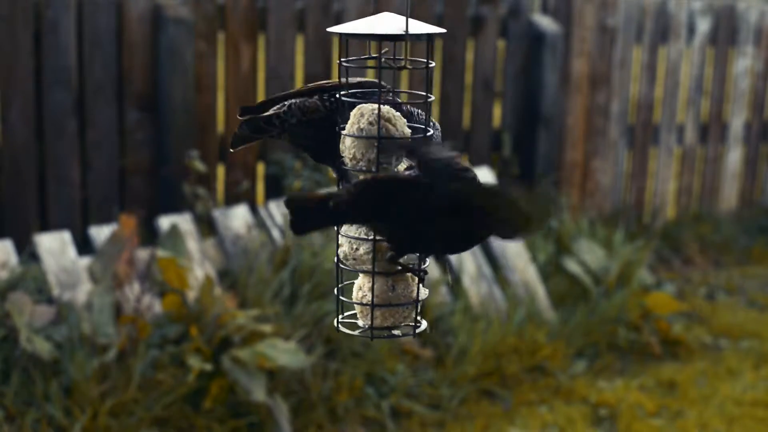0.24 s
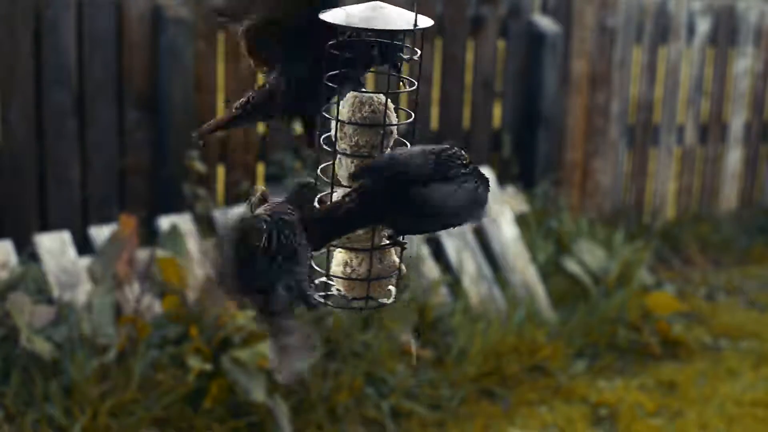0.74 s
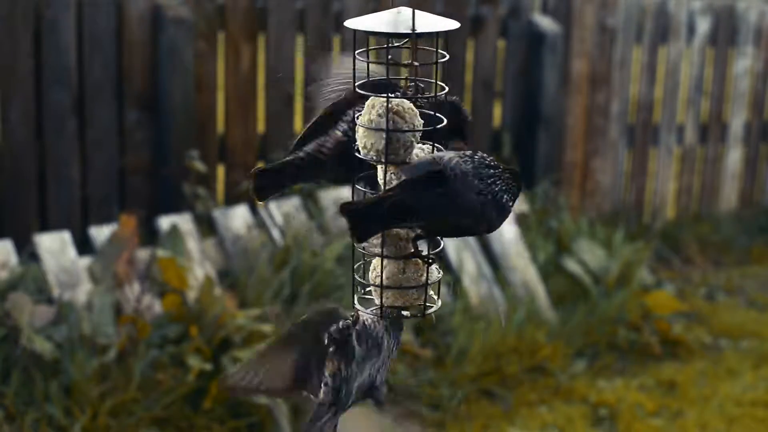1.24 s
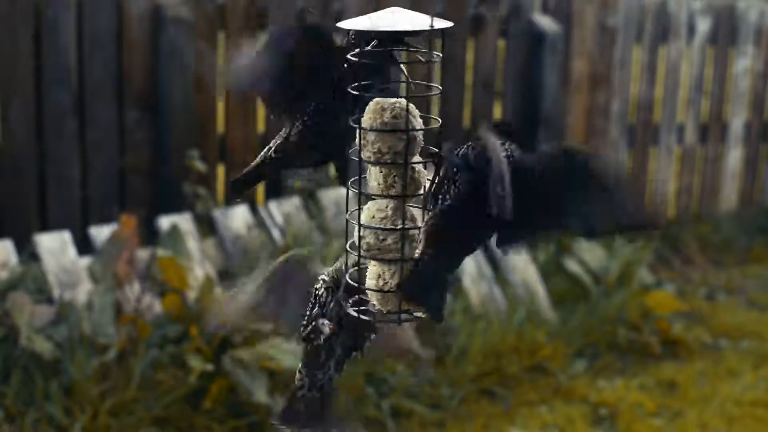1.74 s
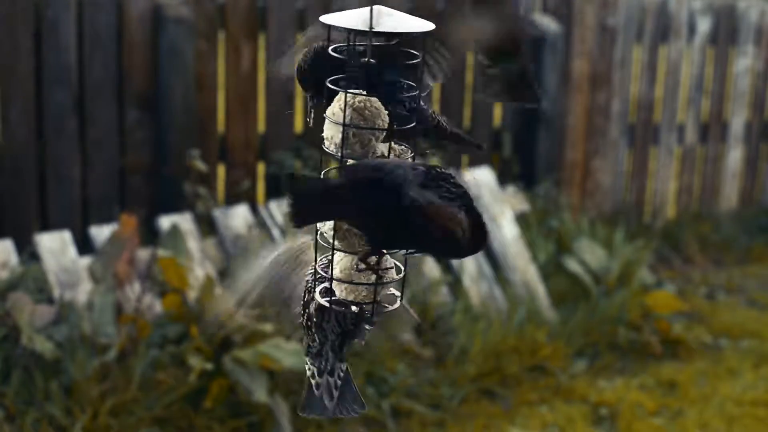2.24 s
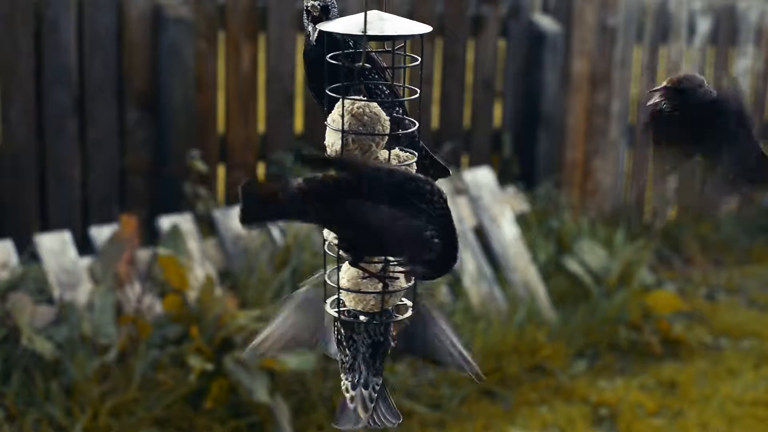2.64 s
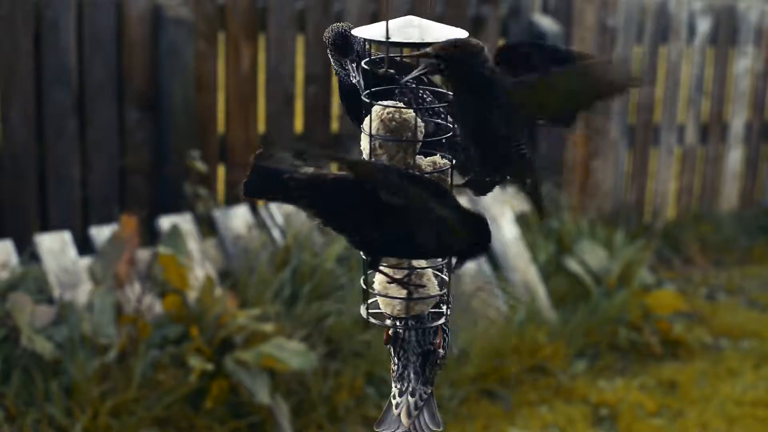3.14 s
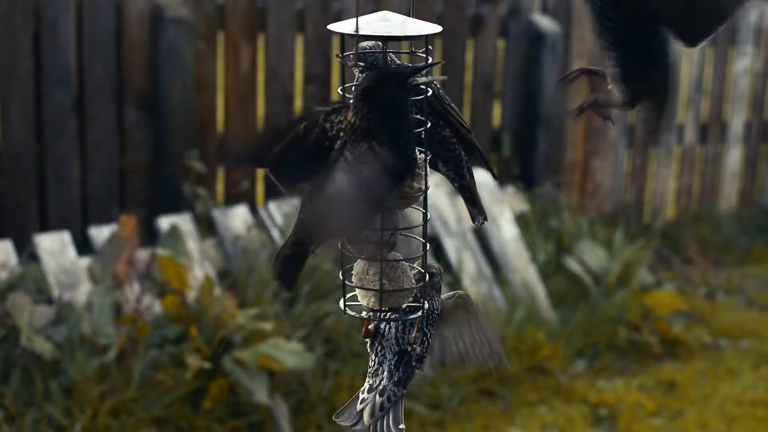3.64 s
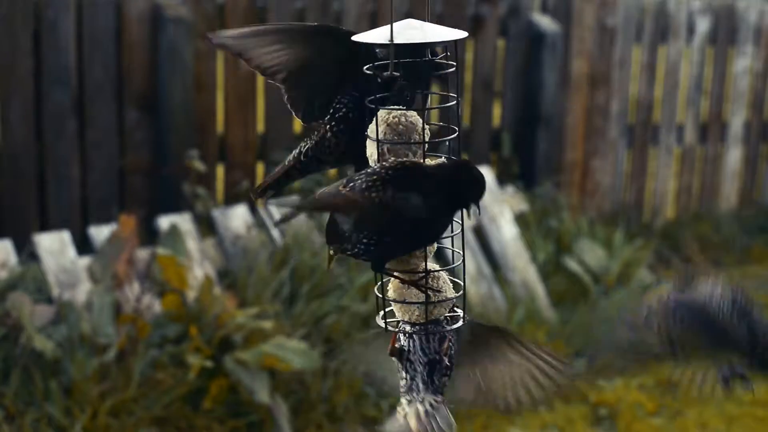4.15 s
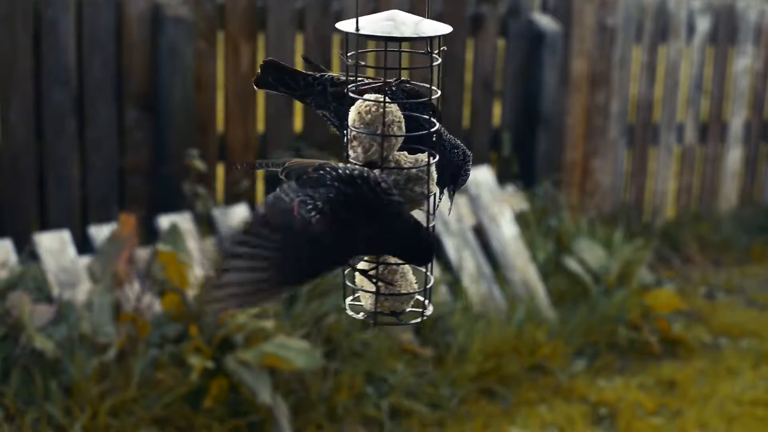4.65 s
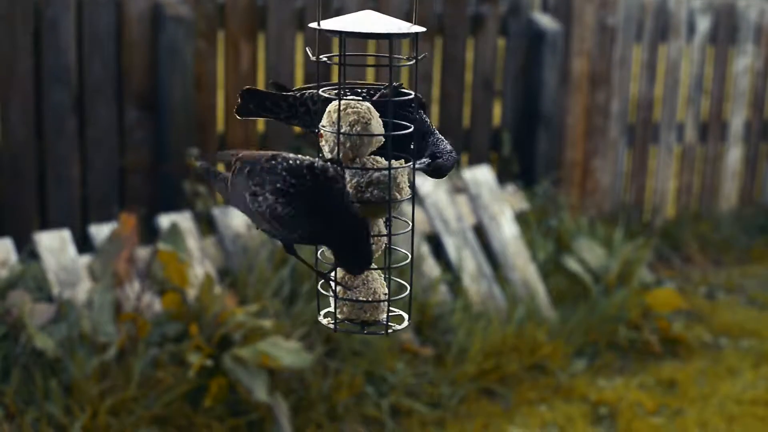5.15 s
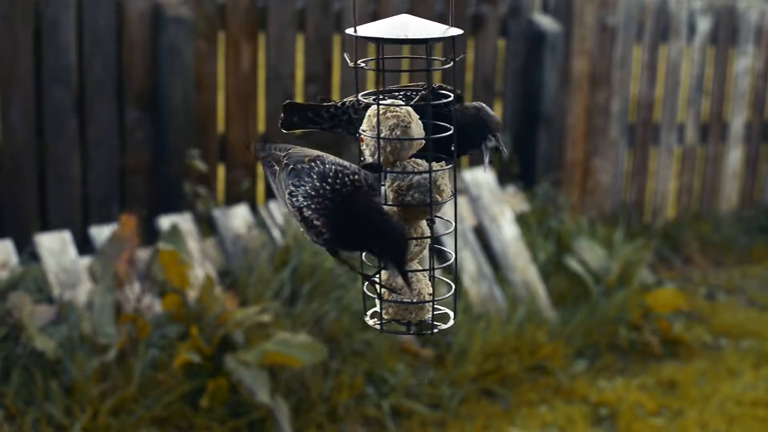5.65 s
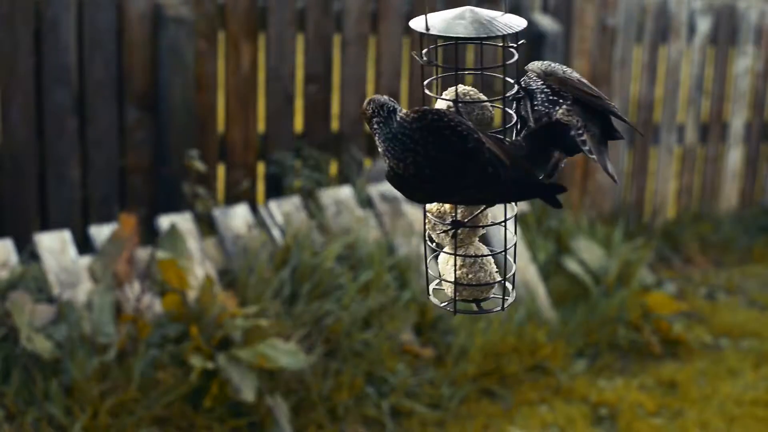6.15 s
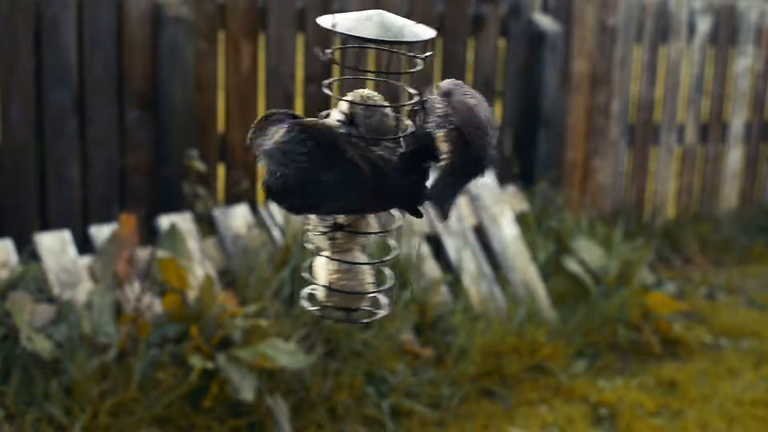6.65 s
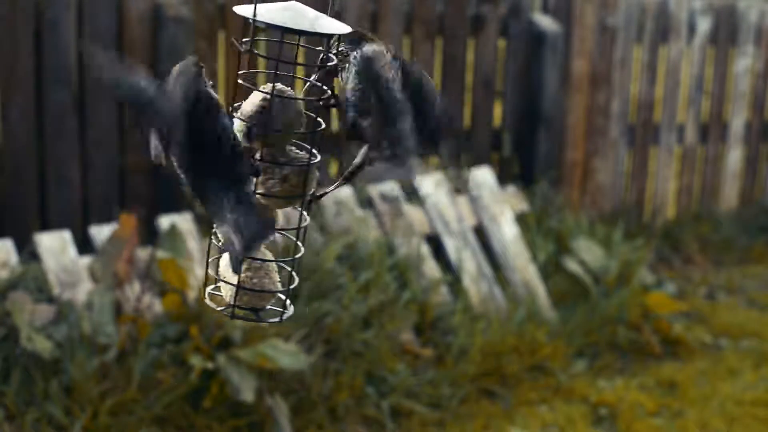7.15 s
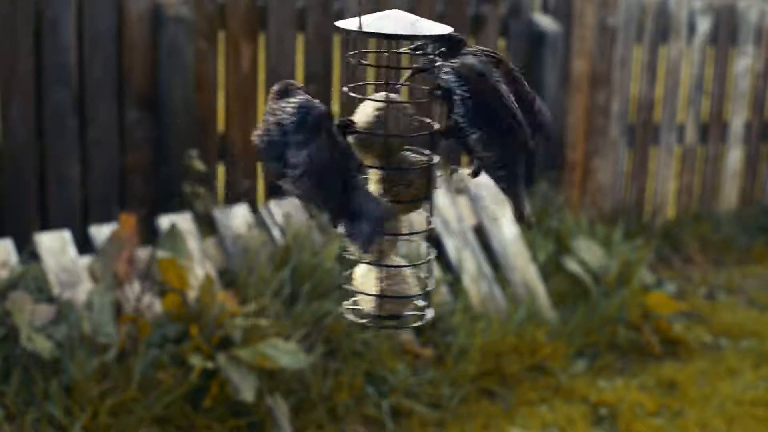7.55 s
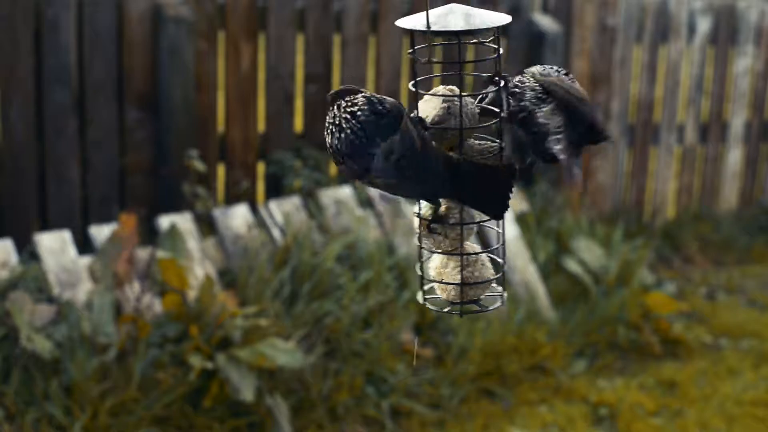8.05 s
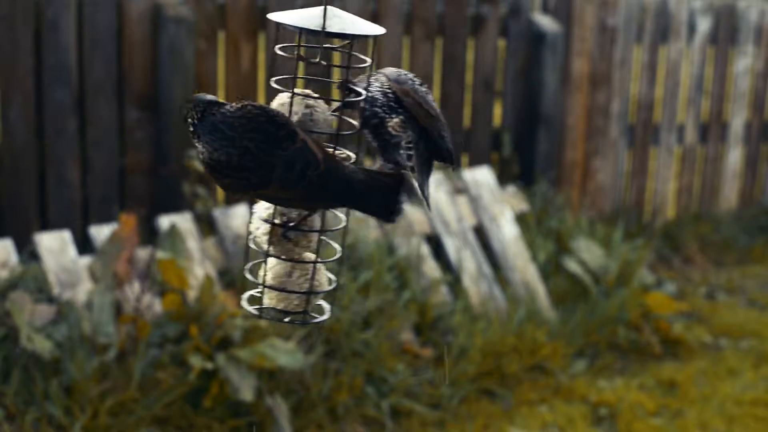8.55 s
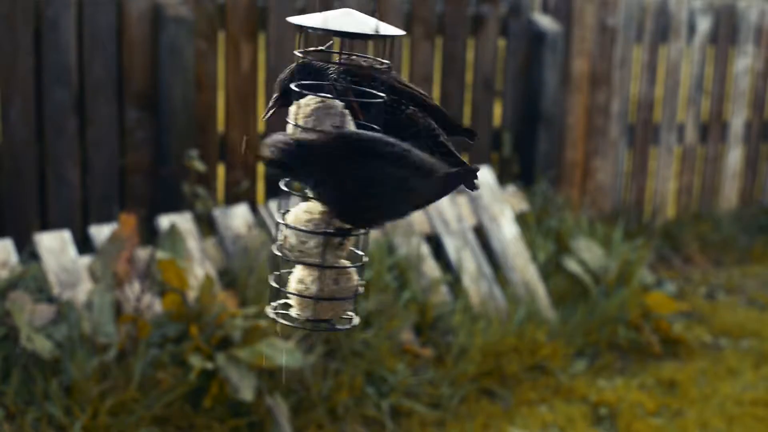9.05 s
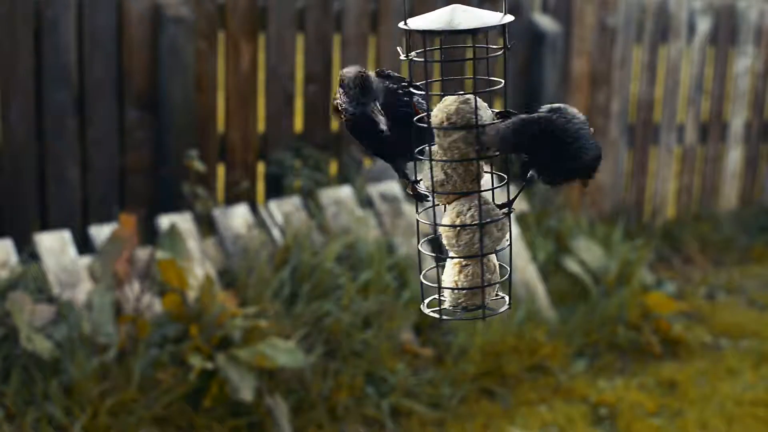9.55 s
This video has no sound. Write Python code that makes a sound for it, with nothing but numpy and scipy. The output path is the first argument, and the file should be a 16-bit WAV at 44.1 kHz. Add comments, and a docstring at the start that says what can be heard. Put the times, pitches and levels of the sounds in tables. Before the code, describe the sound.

Several small birds bicker close by in piercing squeals, scratchy chatter and ragged rasps, with dry clicks and soft wing flutter over a faint outdoor murmur.

```python
"""In a fenced garden, starlings squabble over a wire feeder.
Their calls glide from thin whistles through fast trills into harsh rasps: one model of a vibrating
membrane, driven at rising strain. Other birds chatter in scratchy syllables, and sharp clicks of bills
and claws are short damped oscillations. Wings rustle and puff as shaped noise, dull knocks ring as low
modes, and a faint outdoor murmur of filtered noise lies underneath, dipping once."""
import sys
import numpy as np
from scipy import signal
from scipy.fft import rfft, irfft, next_fast_len
from scipy.io import wavfile
from scipy.ndimage import uniform_filter1d

SR = 44100
rng = np.random.default_rng(int(sys.argv[2]) if len(sys.argv) > 2 else 0)


def int16_out(signal):
    """Quantize to a 16-bit WAV file."""
    q = np.round(np.clip(np.atleast_2d(signal).T, -1, 1) * 32767)
    wavfile.write(sys.argv[1], SR, q.astype(np.int16))


N = 431738


def from_db(db):
    """Logarithmic level: 20 dB is a factor of ten in amplitude."""
    return 10 ** (np.asarray(db) / 20)


def rms_one(x):
    """Normalisation of the mean power to one."""
    return x / np.sqrt(np.mean(x ** 2) + 1e-20)


def band(x, low_hz, high_hz):
    """Band-pass filtering with gentle Butterworth slopes."""
    sos = signal.butter(2, [low_hz, min(high_hz, .45 * SR)], "band", fs=SR, output="sos")
    return signal.sosfilt(sos, x)


def wander(rate_hz, size):
    """Low-pass filtered noise: smooth random motion up to about the given rate, with rms 1."""
    sos = signal.butter(2, rate_hz, fs=SR, output="sos")
    slow = signal.sosfilt(sos, rng.standard_normal(size + SR // 10))
    return rms_one(slow[-size:])    # the filter has settled by here


def coloured_noise(colour, peaks=()):
    """Spectral shaping: white noise weighted by a smooth curve and a few broad resonances; rms 1."""
    size = next_fast_len(N)
    hz = np.maximum(np.fft.rfftfreq(size, 1 / SR), 1)
    points = np.array(colour)
    db = np.interp(np.log(hz), np.log(points[:, 0]), points[:, 1])
    for centre_hz, width_hz, height_db in peaks:
        db = db + height_db / (1 + (2 * (hz - centre_hz) / width_hz) ** 2)
    spectrum = rfft(rng.standard_normal(size)) * from_db(db)
    return rms_one(irfft(spectrum)[:N])


def bouts(rows, rest_db):
    """Power addition: a bell-shaped swell of gain for each bout, over a resting level."""
    t = np.arange(N) / SR
    power = from_db(rest_db) ** 2 + np.zeros(N)
    for middle_s, length_s, level_db, *_ in rows:
        first = max(int((middle_s - 2 * length_s) * SR), 0)
        near = slice(first, int((middle_s + 2 * length_s) * SR))
        bell = np.exp(-2 * (2 * (t[near] - middle_s) / length_s) ** 2)
        power[near] += from_db(level_db) ** 2 * bell
    return np.sqrt(power)


def progress(length_s):
    """Normalised time, from 0 to 1 through a note of at least 10 ms."""
    return np.linspace(0, 1, int(max(length_s, .01) * SR))


def arch(u, start_hz, middle_hz, end_hz):
    """Pitch glide: a parabola in log frequency through three points."""
    curve = np.polyfit([0, .5, 1], np.log([start_hz, middle_hz, end_hz]), 2)
    return np.exp(np.polyval(curve, u))


def swell(u, place, swell_db, fade_db):
    """Amplitude envelope: the level in dB climbs to its peak, then falls away."""
    return np.interp(u, [0, np.clip(place, .01, .99), 1], [-swell_db, 0, -fade_db])


def add(out, start_s, note, fade_s=0.0019):
    """Superposition: mixes a note in at its time, with a quick onset and release."""
    t = np.arange(len(note)) / SR
    gate = np.clip(np.minimum(t, t[-1] - t) / fade_s, 0, 1)
    at = int(start_s * SR)
    out[at:at + len(note)] += gate * note


def syrinx(trill_hz, pitch, first_db, octave_db, strain, trill_depth=.08, rasp_depth=.075, waver=.005,
           throb_db=3.0, flutter_db=3.0, grit_db=4.0, third_db=-11.0, fourth_db=-20, hiss_db=-17,
           side_ratio=.4, side_depth=0.27):
    """Nonlinear vibration: strain first shakes a membrane into a trill, then into chaos."""
    size = len(pitch)
    chaos = np.clip((strain - .42) / .5, 0, 1)
    # slower trills have time to swing wider
    trill = np.clip((strain - .1) / .45, 0, 1) * np.sqrt(150 / trill_hz)

    # the trill is a lopsided, slightly irregular swing of pitch and loudness
    turn = 2 * np.pi * np.cumsum(trill_hz * (1 + .1 * wander(50, size))) / SR
    swing = (np.sin(turn) - 0.48 * np.sin(2 * turn)) * (1 - .5 * chaos)
    lurch, grit = wander(300, size), wander(260, size)
    bend = trill_depth * trill * swing + rasp_depth * chaos * lurch + waver * wander(270, size)
    phase = 2 * np.pi * np.cumsum(pitch * np.exp(bend)) / SR
    throb = throb_db * trill ** 2 * np.cos(turn)
    shake = from_db(throb + flutter_db * wander(70, size) + grit_db * chaos * grit)
    # the running power is evened out, leaving only the fast shaking
    shake = shake / np.sqrt(uniform_filter1d(shake ** 2, size=1100))

    # under strain a slower vibration couples in and splits each partial into strands
    slow_hz = side_ratio * pitch * np.exp(0.099 * wander(60, size))
    slow = 2 * np.pi * np.cumsum(slow_hz) / SR
    strands = side_depth * chaos * np.sin(slow)

    upper_db = np.minimum(first_db, octave_db)
    partials_db = [first_db, octave_db, upper_db + third_db, upper_db + fourth_db]
    tone = 0
    for k, db in enumerate(partials_db, 1):
        below_nyquist = np.clip((SR / 2 - k * pitch) / (SR / 20), 0, 1)
        tone = tone + np.sqrt(2) * from_db(db) * np.sin(k * phase + strands) * below_nyquist

    # chaotic vibration also throws off broad hiss
    hiss = rms_one(band(rng.standard_normal(size), 1900, 11000))
    hiss = hiss * chaos * np.hypot(from_db(first_db), from_db(octave_db))
    return shake * tone + from_db(hiss_db) * hiss


def murmur():
    """Broad resonance in noise: a hollow outdoor murmur that drops once and recovers exponentially."""
    # smooth spectrum of the murmur: frequency_hz, relative_level_db
    murmur_colour = [(25, -13), (60, 1.5), (130, -5), (230, 6.5), (330, -15), (450, -7.5), (720, -11.5),
                     (1080, -1), (1280, -10.5), (2000, -6.5), (4000, -25), (10000, -42.5), (15000, -55)]
    # broad resonances that make it hollow: centre_hz, width_hz, height_db
    murmur_peaks = [(566, 250, 17.5), (877.5, 110, 13), (1424, 92, 7)]
    early_db, late_db = -68, -71.5      # before the dip and long after it
    dip_at_s, dip_db, recover_s = 5.99, 18, 0.2
    since = np.arange(N) / SR - dip_at_s
    recovering_db = late_db - dip_db * np.exp(-np.abs(since) / recover_s)
    db = np.where(since < 0, early_db, recovering_db)
    return from_db(db) * coloured_noise(murmur_colour, murmur_peaks)


def whistles():
    """Near-sinusoidal vibration at low strain: notes that scoop up at the start and drop at the end."""
    # thin, clean whistles, pitches before scoop and drop: start_s, length_s, start_hz, middle_hz, end_hz,
    # level_db, peak_place (0-1), octave_db (relative to the fundamental)
    whistle_notes = [ (0.051, 0.051, 5230, 5950, 5780, -58.5, 1, -15.5),
                     (1.13, 0.038, 5100, 5440, 5620, -52.5, 0.8, -9),
                     (1.853, 0.031, 2620, 3565, 3850, -53.5, .7, 8.5),
                     (1.876, 0.078, 3960, 3984, 3800, -56.5, .65, 16.5),
                     (2.05, 0.036, 5820, 5490, 5350, -35.5, .9, -9),
                     (2.076, .062, 5560, 5040, 5666, -31.5, .3, -3),
                     (2.265, 0.09, 7670, 6230, 6270, -36, 0.33, -23),
                     (2.94, 0.082, 4570, 4260, 4600, -44.5, 0.15, -23),
                     (3.289, 0.062, 3153, 3483, 3050, -59.5, 0.7, 13.5),
                     (3.338, .018, 5230, 5420, 6140, -34.5, 0.94, -11.5),
                     (3.383, 0.049, 6590, 6250, 6560, -25.5, 0.06, -27),
                     (3.603, 0.0347, 4310, 4400, 4490, -38.5, .7, -9.5),
                     (3.912, 0.072, 4120, 3960, 3580, -57, 0.54, -15),
                     (4.087, .045, 3740, 3500, 3940, -54, 0.3, 7),
                     (4.135, 0.08, 3730, 3860, 3870, -62, 0.55, 6),
                     (4.217, 0.074, 4160, 4320, 3890, -65.5, 1, 3),
                     (4.358, 0.075, 6390, 5900, 5120, -51, 0.1, -28),
                     (4.452, .052, 5500, 5500, 4700, -53, 0.94, -13),
                     (4.51, .07, 3700, 3840, 4050, -76, 1, 19),
                     (4.578, 0.057, 4170, 3920, 3820, -62, 0.85, 24.5),
                     (5.05, 0.052, 7700, 6930, 6360, -58.5, 0.8, -25),
                     (5.095, 0.085, 7230, 6500, 5770, -60.5, 0, -20),
                     (5.197, .08, 7200, 6620, 5500, -65.5, 0.3, -26),
                     (5.292, 0.049, 4900, 5100, 4900, -70, 0.75, -13),
                     (5.352, 0.065, 3530, 3780, 5280, -67, 1, -16.5),
                     (6.821, 0.0156, 6170, 7060, 8210, -58, 0.54, -18),
                     (6.868, 0.043, 7830, 7050, 6400, -67, 0.34, -22),
                     (7.206, 0.066, 7180, 6660, 5660, -51.5, 1, -20),
                     (7.28, 0.04, 4800, 4470, 3600, -65, 0.1, 0),
                     (7.318, 0.046, 4170, 4100, 3580, -60, 0.1, 1.5),
                     (7.371, .075, 4520, 4340, 4230, -57.5, 1, -5),
                     (7.505, 0.096, 4380, 4050, 3330, -56.5, 0, -12),
                     (7.833, 0.078, 4400, 4275, 4130, -63.5, 0.1, 2),
                     (7.837, 0.11, 9860, 7400, 7020, -52, 0.07, -27),
                     (8.903, 0.09, 6200, 5580, 5030, -78, 0.62, -13),
                     (9.312, 0.04, 8740, 7650, 7310, -50.5, 0.64, -28)]
    strain, swell_db, fade_db = 0.13, 9.5, 5    # each end lies this many dB below the peak
    scoop, drop, slide_s = .06, .09, 0.0077     # slides in log frequency, and their time constant
    out = np.zeros(N + SR)
    for start_s, length_s, start_hz, middle_hz, end_hz, db, place, octave_db in whistle_notes:
        u = progress(length_s)
        slide = scoop * np.exp(-u * length_s / slide_s) + drop * np.exp((u - 1) * length_s / slide_s)
        pitch = arch(u, start_hz, middle_hz, end_hz) * np.exp(-slide)
        level = db + swell(u, place, swell_db, fade_db)
        note = syrinx(130, pitch, level, level + octave_db, strain,
                      waver=0.0064, flutter_db=1.5, third_db=-11)
        add(out, start_s, note)
    return out[:N]


def squeals():
    """Frequency and amplitude modulation: arching trills whose strain changes steadily."""
    # trilled squeals: start_s, length_s, start_hz, middle_hz, end_hz, level_db, peak_place (0-1),
    # octave_db (relative to the fundamental), first_strain (0-1), last_strain (0-1), trill_hz
    squeal_notes = [ (0.101, 0.11, 5310, 4020, 3260, -53, 0.05, -13.5, 0.47, 1, 125),
                    (.245, .12, 5730, 4366, 2696, -39, .25, -16.5, 0.37, 0.71, 125),
                    (0.428, 0.19, 5500, 4910, 3290, -58.5, .4, -15.5, 0.17, 0.97, 120),
                    (1.001, 0.084, 4580, 4460, 3060, -43, .4, -28, 0.2, 0.98, 135),
                    (1.131, 0.12, 8180, 8390, 7550, -34.5, .5, -22, 0.13, 0.6, 71),
                    (1.165, 0.14, 5610, 4300, 2670, -44.5, .25, -10, 0.26, 0.83, 89.1),
                    (1.226, 0.069, 6900, 6056, 5590, -36, .2, -21, 0.2, .6, 71),
                    (1.283, 0.058, 5700, 5830, 5990, -35, .7, -17, 0.2, 0.2, 165),
                    (1.338, 0.14, 6130, 6445, 6130, -23.5, .65, -20.5, 0.39, .5, 165),
                    (1.46, 0.093, 5530, 4850, 4700, -36.5, .12, -10, 0.54, 0.47, 164),
                    (1.545, 0.095, 4500, 3910, 3130, -53, .15, 4, 0.77, 0.66, 165),
                    (1.481, 0.081, 8900, 8360, 7270, -37.5, .4, -20, 0.43, 0.6, 203),
                    (1.555, 0.18, 7710, 6970, 6220, -31, .25, -22.5, 0.55, 0.38, 203),
                    (1.921, 0.14, 8020, 7650, 5690, -31.5, 0.42, -16.5, 0.45, 0.36, 79),
                    (2.127, 0.076, 5320, 5285, 5510, -32.5, 0.1, 1, .15, 0.61, 187),
                    (2.33, 0.14, 5440, 3900, 2630, -52.5, .05, -4.5, 0.4, 1, 132),
                    (2.347, 0.14, 6100, 6710, 6000, -41, .65, -17.5, 0.3, 0.31, 163),
                    (2.636, 0.048, 4910, 5550, 5760, -41.5, 0.98, -4, 0.07, 0.33, 172),
                    (2.684, 0.025, 5160, 5130, 4290, -31, 0.35, -13, 0.5, 0.05, 179),
                    (2.7, 0.12, 4410, 4035, 4000, -41.5, 0, 2, 0.5, 0.96, 172),
                    (2.76, 0.057, 1858, 1500, 1300, -60.5, .55, -6, 0.4, 0.4, 124),
                    (3.007, 0.027, 4370, 4790, 4800, -43, .1, -17, .15, .6, 110),
                    (3.068, 0.079, 8470, 8060, 7400, -46.5, .75, -10, 0.5, 0.3, 55.7),
                    (3.138, 0.12, 7340, 5495, 4410, -38.5, .12, -11.5, 0.27, 0.85, 82),
                    (3.354, .036, 6000, 6640, 6160, -22, .3, -26.5, .2, 0.49, 139),
                    (3.52, 0.11, 4470, 4330, 4270, -46.5, 0.49, -6, 0.54, .45, 139),
                    (3.642, 0.077, 3960, 3350, 3050, -48, 0, -7, 0.35, 0.6, 139),
                    (4.016, 0.081, 4860, 5050, 4380, -34.5, 0.56, -12.5, 0.51, 0.4, 120),
                    (4.581, 0.077, 4460, 4880, 4400, -53.5, .45, -7.5, 0.5, 0.55, 140),
                    (4.653, 0.1, 3300, 3920, 3580, -51, 0.5, -19, 0.44, .48, 90),
                    (5.989, 0.24, 2560, 2990, 2870, -68.5, .15, -32, 0.41, 0.73, 130),
                    (6.499, .05, 1990, 2580, 2800, -62.5, 0.53, -29, 0.34, .55, 133),
                    (7.622, 0.083, 4460, 4920, 4300, -42.5, .55, -15, 0.54, 0.37, 115),
                    (7.699, .055, 3040, 3490, 3700, -58.5, .1, 1.5, 0.65, 0.03, 115),
                    (7.761, 0.068, 3370, 3790, 3470, -58, .4, 1.5, 0.96, 0.65, 115),
                    (7.932, 0.082, 3680, 3240, 2950, -64.5, .4, -8.5, 0.65, 0.51, 129),
                    (8.032, 0.079, 4950, 4940, 4190, -57.5, 0.28, -11, 0.35, 0.35, 139.3),
                    (8.138, 0.061, 5180, 4530, 4000, -58, 0.8, -2, 0.14, 0.27, 143),
                    (8.205, 0.05, 4980, 4940, 4700, -61.5, 0.2, -5.5, 0.2, .5, 144),
                    (8.396, 0.039, 4700, 5300, 5750, -54.5, 0.52, -21, 0.35, 0.9, 112.6),
                    (8.6, 0.048, 5130, 5080, 4610, -53, 0.67, -12, 0.76, 0.8, 113.8),
                    (9.294, 0.061, 3920, 4730, 5880, -61.5, 0.54, -15, 0.48, 0.99, 125),
                    (9.741, 0.049, 4980, 4290, 3980, -57, 1, -5, 1, .35, 129)]
    swell_db, fade_db = 10.5, 13.5
    throb_db = 2    # for a 130 Hz trill; slower trills throb more deeply
    out = np.zeros(N + SR)
    for (start_s, length_s, start_hz, middle_hz, end_hz, db, place, octave_db,
         first_strain, last_strain, trill_hz) in squeal_notes:
        u = progress(length_s)
        pitch = arch(u, start_hz, middle_hz, end_hz)
        level = db + swell(u, place, swell_db, fade_db)
        strain = first_strain + (last_strain - first_strain) * u
        note = syrinx(trill_hz, pitch, level, level + octave_db, strain,
                      throb_db=throb_db * 130 / trill_hz, side_depth=.55, third_db=-9.5)
        add(out, start_s, note)
    return out[:N]


def rasps():
    """Chaotic vibration: heavy strain flings the pitch up and down in slow, wide, ragged strokes."""
    # harsh rasps: start_s, length_s, start_hz, end_hz, level_db, octave_db (relative to the fundamental)
    rasp_notes = [ (0.202, 0.054, 5500, 5700, -59, -23), (0.344, 0.05, 4100, 3870, -55, -29),
                  (0.968, 0.046, 3507, 3730, -60.5, -1.5), (2.758, 0.066, 5050, 4670, -45.5, -16),
                  (2.818, 0.12, 3500, 3140, -56, 5), (3.444, 0.069, 5880, 4850, -43.5, -10),
                  (4.024, 0.08, 4300, 4030, -55.5, 15), (4.649, 0.089, 3645, 3894, -57.5, -3.5),
                  (6.551, .11, 1897, 2050, -71.5, -10), (6.849, 0.19, 4000, 4530, -80, -12),
                  (7.018, .045, 2900, 2410, -65, -2), (7.106, 0.11, 4120, 3930, -70, -12),
                  (7.64, 0.059, 3950, 3560, -57, 11), (8.296, 0.082, 3636, 3466, -64, -3.5),
                  (8.369, 0.1, 3900, 3880, -71, 13.5), (8.545, .11, 4114, 3856, -59, 6),
                  (9.346, 0.1, 3483, 4060, -71, -16), (9.495, 0.08, 3523, 3400, -62, -2),
                  (9.649, 0.072, 4720, 4140, -60.5, -12)]
    strain, trill_hz, taper_db = .78, 49.8, 4
    out = np.zeros(N + SR)
    for start_s, length_s, start_hz, end_hz, db, octave_db in rasp_notes:
        u = progress(length_s)
        level = db + swell(u, 0.61, taper_db, taper_db)
        pitch = start_hz * (end_hz / start_hz) ** u
        note = syrinx(trill_hz, pitch, level, level + octave_db, strain, trill_depth=0.111, rasp_depth=.04,
                      throb_db=-0.05, hiss_db=-21, side_ratio=0.4, side_depth=0.69)
        add(out, start_s, note)
    return out[:N]


def starlings():
    """Superposition of the calls of the birds nearest by."""
    return whistles() + squeals() + rasps()


def chatter(count=3, level_db=-7, spread=0.27, glide=0.18, octave_db=-6, syllable_db=3, strain_mean=.58):
    """Random syllables: each of the other birds strings together short, scratchy rises and falls."""
    # bouts of bickering, levels before the overall gain: middle_s, length_s, level_db, centre_hz
    chatter_bouts = [(0.265, 0.072, -51.5, 2892), (0.373, 0.047, -55.5, 2900), (0.565, 0.089, -61.5, 4310),
                     (.88, 0.091, -66.5, 4200), (.95, 0.092, -61, 2408), (1.048, 0.047, -54.5, 2900),
                     (1.314, 0.073, -57.5, 3000), (1.54, 0.17, -52, 3600), (2.376, 0.19, -65.5, 4200),
                     (2.78, .16, -45, 5000), (3.047, .25, -85, 4000), (3.521, 0.24, -54.5, 3800),
                     (4.618, 0.5, -66, 4000), (5.026, 0.3, -68, 2700), (5.191, 0.066, -65, 3100),
                     (5.451, 0.17, -68.5, 4000), (6.917, 0.2, -74, 4400), (7.039, 0.082, -61.5, 3800),
                     (7.152, 0.097, -69, 4980), (7.78, 0.14, -57.5, 4955), (7.94, 0.064, -66.5, 4300),
                     (8.2, 0.48, -68.5, 2991), (8.41, 0.23, -58, 3693), (8.59, .08, -65, 3810),
                     (8.9, 0.25, -79, 4500), (9.41, 0.11, -62.5, 3600), (9.511, 0.042, -59.5, 2500),
                     (9.541, 0.19, -59.5, 4295)]
    t, out = np.arange(N) / SR, 0
    middles, _, _, centres = np.transpose(chatter_bouts)
    centre_hz = np.interp(t, middles, centres)
    for bird in range(count):
        edges = np.concatenate([[0], np.cumsum(rng.uniform(.008, .042, 600))])     # syllable bounds, s
        place = np.interp(t, edges, np.arange(len(edges)))
        traits = rng.standard_normal((len(edges), 4))
        height, slope, effort, harshness = traits[place.astype(int)].T
        through = place % 1
        bend = spread * np.clip(height, -2, 2) + glide * slope * (2 * through - 1)
        pitch = centre_hz * np.exp(bend)
        db = syllable_db * np.clip(effort, -2, 1)
        strain = np.clip(strain_mean + .2 * harshness, 0, 1)
        voice = syrinx(130, pitch, db, db + octave_db, strain, third_db=-21, fourth_db=-9.0)
        out = out + np.sin(np.pi * through) * voice
    return from_db(level_db) * bouts(chatter_bouts, rest_db=-88.5) * out


def wings(level_db=-1, gust_db=4.5, grain_db=2.0):
    """Friction noise: feathers brush unevenly against each other and the wire."""
    # wings and feathers rustle, levels before the overall gain: middle_s, length_s, level_db
    rustle_bouts = [(.3, 1.2, -94), (1.8, 2.25, -74), (3.5, 3, -76), (4.06, .07, -57), (4.7, 0.5, -78),
                    (5.13, 0.25, -68.5), (5.47, 0.13, -70.5), (7.05, 0.49, -93), (8.57, 0.18, -57.5),
                    (8.9, 0.25, -78), (9.56, 0.18, -70.5)]
    # spectrum of the rustle: frequency_hz, relative_level_db
    rustle_colour = [(700, -28.5), (1500, -25), (2200, 6), (3500, -9), (6000, 5), (9000, 4), (12000, -5),
                     (16000, -5)]
    uneven = from_db(level_db + gust_db * wander(25, N) + grain_db * wander(300, N))
    return bouts(rustle_bouts, rest_db=-89.5) * uneven * coloured_noise(rustle_colour)


def wing_air(low_hz=75, high_hz=230):
    """Turbulence: wing strokes push low puffs of air."""
    # flurries of wing strokes: middle_s, length_s, level_db
    flap_bouts = [(.4, 1.0, -79), (1.6, .35, -73), (2.7, 0.38, -73.5), (3.67, 0.52, -73.5), (4.4, 1, -87),
                  (5.8, 0.23, -76.5), (7.05, 0.1114, -77), (8.05, 0.8, -75), (8.98, 0.23, -73)]
    puffs = rms_one(band(rng.standard_normal(N), low_hz, high_hz))
    return bouts(flap_bouts, rest_db=-91.5) * puffs


def bill_clicks(ring_hz=6700, ring_s=0.000075, tail_s=0.013, tail_db=-19, level_db=1):
    """Impulse response: a snap of two or three cycles, then a short scatter off the feeder."""
    # clicks of bills and claws: time_s (sounding 1 ms later), peak_db (before the overall gain)
    click_list = [(3.0415, -32.5), (3.121, -37.5), (3.5585, -28), (3.631, -27.5), (3.9085, -40.5),
                  (3.9704, -33.5), (3.997, -27), (4.132, -40), (4.174, -31.5), (4.2103, -29),
                  (4.281, -42.5), (4.348, -37.5), (4.432, -39), (4.5034, -36), (4.7228, -36.5),
                  (7.0187, -49), (7.0454, -62), (7.063, -56), (7.273, -34), (7.3208, -34), (7.3623, -31),
                  (7.4451, -36), (7.508, -35), (7.569, -38.5), (7.6011, -31), (7.819, -33.5),
                  (7.9062, -32.5), (8.5549, -32.5), (8.821, -51), (9.0993, -53), (9.7357, -40)]
    out, t = np.zeros(N + SR), np.arange(SR // 20) / SR
    for time_s, db in click_list:
        hz = ring_hz * np.exp(0.09 * rng.standard_normal())
        envelope = t / ring_s * np.exp(1 - t / ring_s)
        snap = np.sin(2 * np.pi * hz * t) * envelope
        scatter = rms_one(band(rng.standard_normal(len(t)), 3700, 7700)) * np.exp(-t / tail_s)
        at = int((time_s + 1 / 1000) * SR)
        out[at:at + len(t)] += from_db(db + level_db) * (snap + from_db(tail_db) * scatter)
    return out[:N]


def knocks(rise_s=0.0021, thud_db=-9, thud_s=0.024):
    """Modal decay: each dull knock excites one low mode and a short thud."""
    # dull knocks: start_s, level_db, pitch_hz, t60_s
    knock_list = [(5.108, -49, 128, 0.27), (5.126, -49, 133.3, 0.13), (5.547, -49.5, 168, .08),
                  (5.555, -56.5, 227, 0.54), (5.644, -58, 153, .15)]
    out, t = np.zeros(N + SR), np.arange(SR // 2) / SR
    for start_s, db, hz, t60_s in knock_list:
        mode = np.sin(2 * np.pi * hz * t) * from_db(-60 * t / t60_s)
        thud = rms_one(band(rng.standard_normal(len(t)), 78, 208)) * np.exp(-t / thud_s)
        onset = 1 - np.exp(-t / rise_s)
        at = int(start_s * SR)
        out[at:at + len(t)] += from_db(db) * onset * (mode + from_db(thud_db) * thud)
    return out[:N]


def bounce(x, delay_s, echo_db):
    """Comb filtering: one hard reflection ripples the spectrum."""
    lag = int(delay_s * SR)
    return x + from_db(echo_db) * np.concatenate([np.zeros(lag), x[:-lag]])


def garden(x, near_db=-14, near_s=.009, far_db=-24, t60_s=0.26):
    """Reverberation: quick reflections from feeder and ground, then a faint tail from the fences."""
    t = np.arange(SR // 2) / SR
    near = band(rng.standard_normal(len(t)), 1400, 11000) * np.exp(-t / near_s) * (t > .002)
    far = band(rng.standard_normal(len(t)), 740, 7372) * from_db(-60 * t / t60_s) * (t > .015)
    near_echoes = from_db(near_db) * near / np.linalg.norm(near)
    far_echoes = from_db(far_db) * far / np.linalg.norm(far)
    return x + signal.fftconvolve(x, near_echoes + far_echoes)[:N]


def scene():
    """Superposition of the birds at the feeder and the garden's background."""
    near = garden(bounce(starlings(), delay_s=.0047, echo_db=-7.5) + bill_clicks())
    around = garden(chatter(), near_db=1.5, far_db=-25.5) + wings() + murmur()
    around = bounce(around, delay_s=.0056, echo_db=-17.0)
    return (near + around + wing_air() + knocks())[None]


def record(dry):
    """Low-pass filtering: an elliptic filter cuts the top steeply."""
    cutoff_hz = 15950
    sos = signal.ellip(10, .1, 80, cutoff_hz, fs=SR, output="sos")
    return signal.sosfilt(sos, dry)


dry = scene()
out = record(dry)
int16_out(out)
```